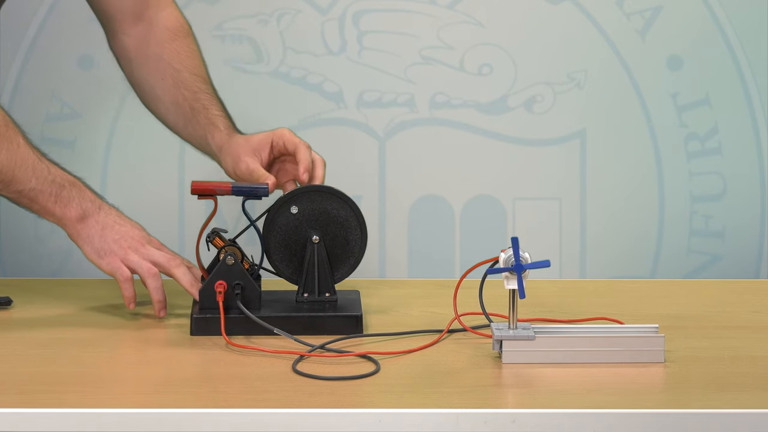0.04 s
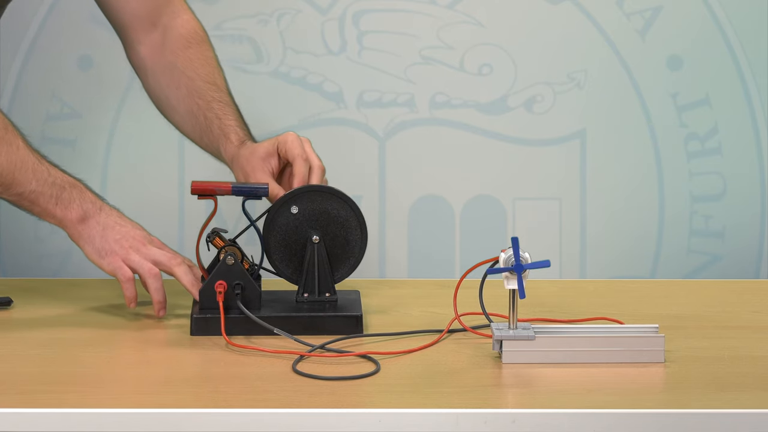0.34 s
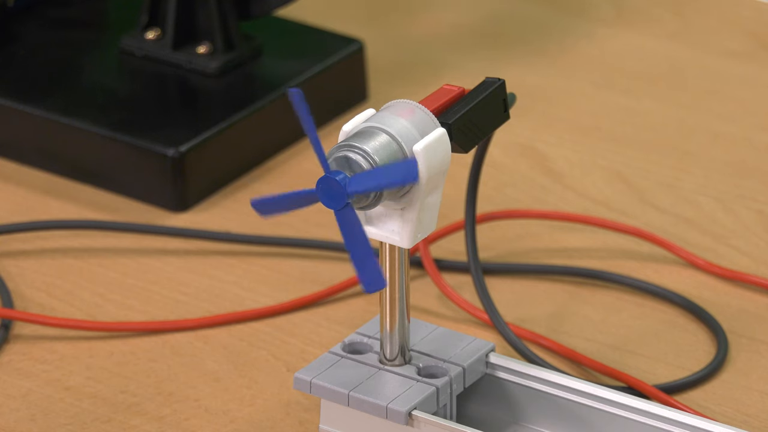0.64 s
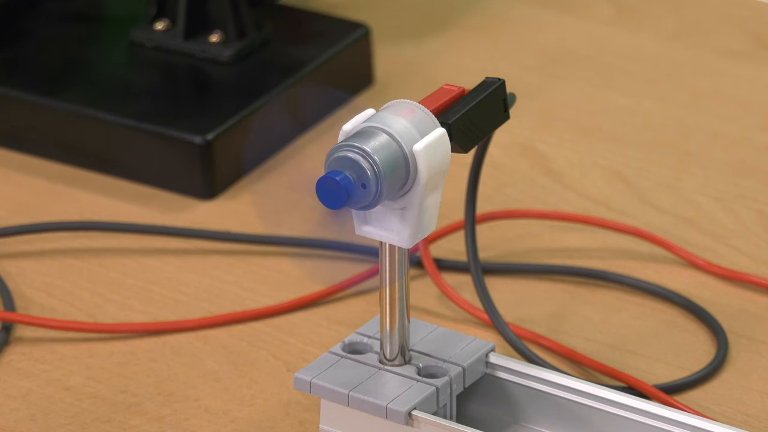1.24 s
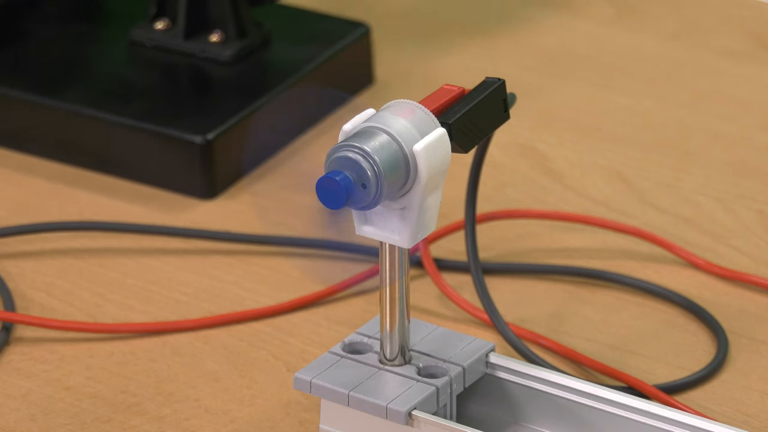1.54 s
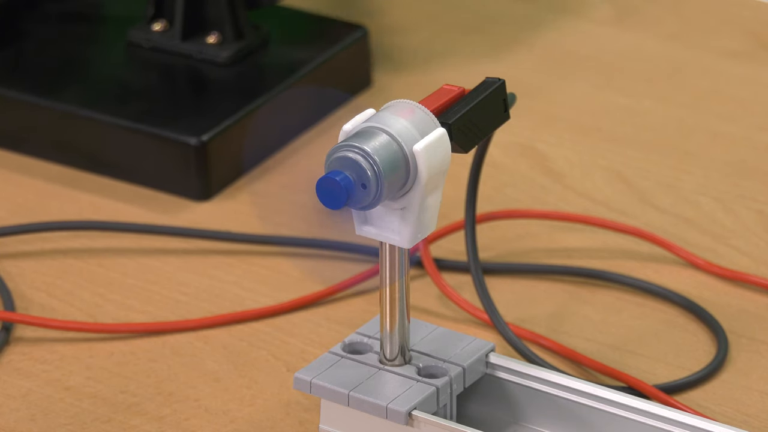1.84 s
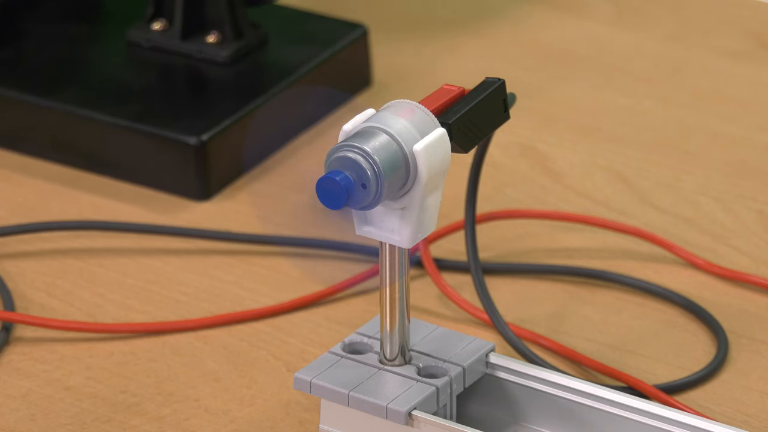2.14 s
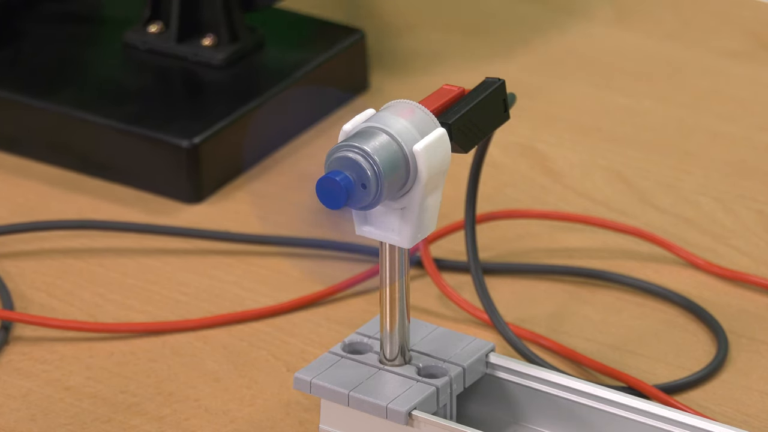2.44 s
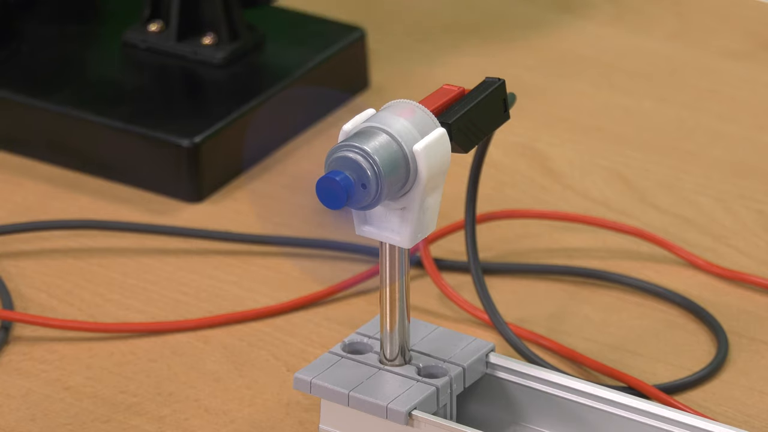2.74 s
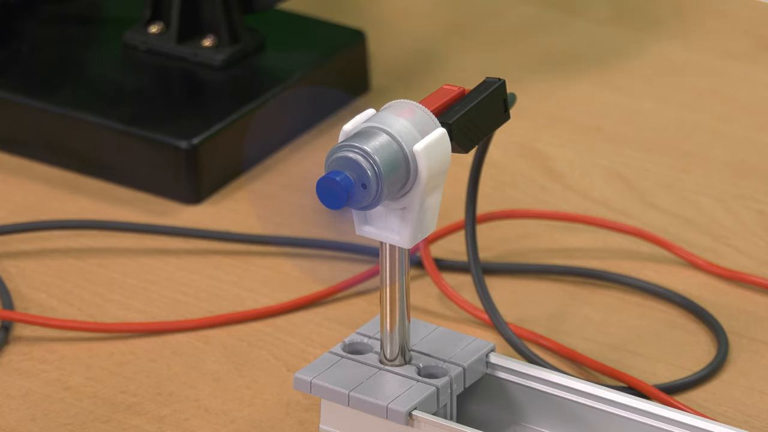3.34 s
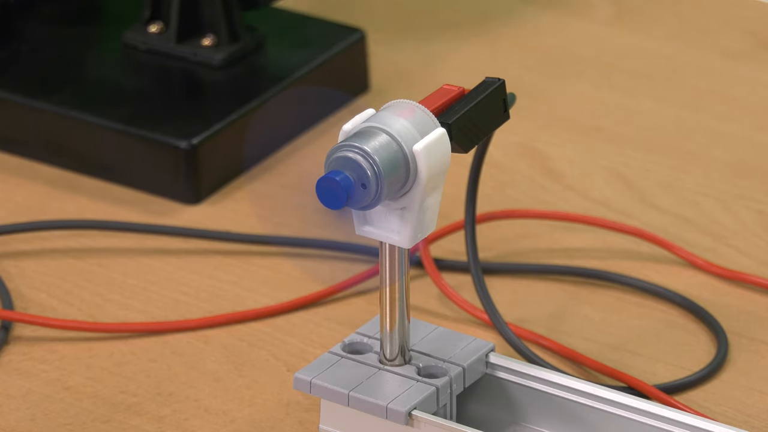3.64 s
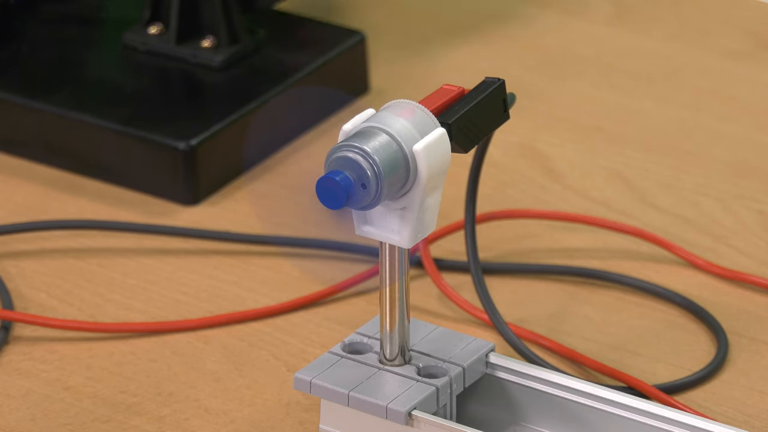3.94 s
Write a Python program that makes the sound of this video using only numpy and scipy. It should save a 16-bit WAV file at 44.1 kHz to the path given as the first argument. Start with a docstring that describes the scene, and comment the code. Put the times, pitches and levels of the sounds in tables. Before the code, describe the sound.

A hand-cranked generator spins up from quick clacks into a loud, whirring metallic rattle.

```python
"""A hand-cranked generator on a table ticks once as it is gripped, then is spun up from rest.
Its drive catches once a turn: single clacks merge into a rattle that grows louder and brighter
with speed as each clack gets shorter. The catches ring the metal parts, the housing and the base.
Behind it lies a small room with a ventilation hum."""
import sys
import numpy as np
from scipy import signal
from scipy.fft import rfft, irfft, next_fast_len
from scipy.io import wavfile
from scipy.ndimage import map_coordinates

SR = 44100
rng = np.random.default_rng(int(sys.argv[2]) if len(sys.argv) > 2 else 0)


def dump_mix(stems):
    """Bounce the given channels to the path in sys.argv[1] as a 16-bit WAV at rate SR."""
    frames = np.atleast_2d(stems).T  # one column per channel
    limited = np.clip(frames, -1, 1)  # hard clip at full scale
    pcm = np.round(limited * 32767).astype(np.int16)
    wavfile.write(sys.argv[1], SR, pcm)


N = 176400

# the run-up (time [s], speed [turns/s])
DRIVE_SPEED = [(0.985, 7.2), (1.15, 14.219), (1.6, 20.714), (1.8, 26.814), (2.15, 35.4), (2.2, 34.81),
               (2.3, 38.67), (2.55, 31.024), (2.75, 39.528), (2.95, 43.618), (3.1, 38.419), (3.15, 41.81),
               (3.3, 42.395), (3.4, 47.854), (3.55, 48.156), (3.65, 43.842), (3.85, 47.214), (4.0, 56.418)]
def drive():
    """The crank spins up in uneven surges: gives the speed and the running count of turns."""
    speed = curve(DRIVE_SPEED)
    cranking = np.arange(N) / SR >= DRIVE_SPEED[0][0]
    return speed, np.cumsum(speed * cranking) / SR


def contact(turns, rise_turns=0.015, decay_turns=0.14, scatter_db=0.78, rub_db=-25,
            chatters_per_turn=6, chatter_db=-10, chatter_s=0.0014):
    """Contact force: one catch a turn, random chatter of loose parts, light rubbing throughout."""
    phase, turn = turns % 1, turns.astype(int)
    strength = amp(scatter_db * rng.standard_normal(turn[-1] + 1))[turn]
    catch = (1 - np.exp(-phase / rise_turns)) * np.exp(-phase / decay_turns)
    hits = rng.random(N) < chatters_per_turn * np.gradient(turns)
    knocks = hits * amp(chatter_db) * rng.random(N)
    chatter = signal.lfilter([1], [1, -np.exp(-1 / (chatter_s * SR))], knocks)
    power = (strength * catch / catch.max()) ** 2 + chatter ** 2 + amp(rub_db) ** 2
    return np.sqrt(power) * (turns > 0)


def grit(force, response, level_db, wet_db):
    """One rattle layer: noise shaped by the contact force, filtered and sent into the room."""
    noise = force * rng.standard_normal((2, N))
    return unit(room(filtered(noise, response), wet_db)) * amp(level_db)


# EQ of the clack's body and of its bright edge (frequency [Hz], gain [dB])
CLACK_EQ = [(300, -32), (500, -1), (950, 3), (1080, -17), (1800, -1), (2600, -2.5), (2800, -4),
            (3300, -4.5), (4000, 2.5), (4600, -3.5), (5300, 5), (6200, -5.5), (7200, -2), (10000, -13.5),
            (16000, -7)]
EDGE_EQ = [(3000, -44), (7000, -19), (8300, -2.5), (9600, -8), (10600, -0.5), (11700, 2), (13000, -1),
           (14200, -2.5), (16000, -5)]
def clacks(force, doublings):
    """The direct sound of the catch; its edge grows faster than its body as the speed doubles."""
    body = grit(force, colour(CLACK_EQ), -53.5 + 8.5 * doublings, wet_db=-2.5)
    edge = grit(force, colour(EDGE_EQ), -52.5 + 11.5 * doublings, wet_db=0)
    return body + edge


# metallic ring (frequency [Hz], width [Hz], gain [dB])
METAL_MODES = [(481.7, 31, 2), (894, 30, -2), (1228, 85, -2.5), (1324, 49, 1), (1589, 54, 4.5),
               (2161, 120, -4.5), (2271, 37, 2), (2427, 64, 4), (2572, 113, 1.5), (3990, 123, -2),
               (5040, 210, -5.5), (5883, 29, -5)]
def metal(force, doublings):
    """The catches ring the metal parts, louder with speed."""
    return grit(force, resonances(METAL_MODES), -54.5 + 10.5 * doublings, wet_db=-3)


# hollow body (frequency [Hz], width [Hz], gain [dB])
HOUSING_MODES = [(364, 18, 0), (843, 72, -1), (1021, 86, -5), (1300, 137, -1.5), (2036, 100, -6),
                 (2297, 130, -4.5)]
# its fader ride (time [s], level [dB])
HOUSING_RIDE = [(1.0, -67), (1.1, -64.5), (1.25, -59), (1.42, -61), (1.6, -61), (1.85, -61.5), (2.2, -55),
                (2.6, -57.5), (3.3, -55.5), (3.6, -53), (4.0, -57)]
def housing(force):
    """The housing answers each catch with a hollow knock."""
    return grit(force, resonances(HOUSING_MODES), curve(HOUSING_RIDE), wet_db=-2.5)


# bright overtones (frequency [Hz], width [Hz], gain [dB])
PING_MODES = [(5900, 330, -1), (6180, 88, 3), (6460, 70, -5)]
# their fader ride (time [s], level [dB])
PING_RIDE = [(1.0, -74.5), (1.44, -68.5), (1.52, -63), (1.63, -60.5), (1.75, -65.5), (2.1, -59.5),
             (2.4, -62), (4.0, -63)]
def ping(force):
    """The catches excite a bright ping that comes out during the run-up."""
    return grit(force, resonances(PING_MODES), curve(PING_RIDE), wet_db=-8)


# top-end shimmer (frequency [Hz], width [Hz], gain [dB])
PULLEY_MODES = [(8922, 34, -3), (11830, 83, -7)]
# its fader ride (time [s], level [dB])
PULLEY_RIDE = [(1.0, -82), (1.6, -72), (2.1, -63), (2.33, -53.5), (2.45, -66), (2.53, -59), (2.7, -59.5),
               (2.88, -53.5), (3.15, -54), (3.36, -56), (3.5, -52.5), (3.62, -54.5), (3.72, -60.5),
               (4.0, -50.5)]
def pulley(force):
    """A thin, nearly dry ring, likely of the pulley."""
    return grit(force, resonances(PULLEY_MODES), curve(PULLEY_RIDE), wet_db=-14)


# resonances of the base and the table top (frequency [Hz], width [Hz], gain [dB])
BASE_MODES = [(781, 14.7, 12.5), (802.6, 20, -3), (830, 5.9, -3)]
TABLE_MODES = [(792, 77, 0)]
# the whirr's fader ride (time [s], level [dB])
BASE_RIDE = [(1.0, -72.5), (1.2, -59), (1.4, -56), (1.6, -58.5), (1.82, -59), (2.05, -54), (2.22, -49.5),
             (2.45, -52), (2.75, -53.5), (3.02, -51.5), (3.22, -49), (3.37, -57), (3.54, -47), (3.66, -53),
             (3.78, -48.5), (4.0, -51)]
def base(speed, turns, shake_s=0.011, roughness=0.78, lag_s=0.005):
    """Each catch knocks the base, whose ring runs together into a hollow whirr."""
    knocks = np.diff(np.ceil(turns), prepend=0) / np.sqrt(speed)
    t = np.arange(SR // 40) / SR
    shake = signal.fftconvolve(knocks, np.exp(-t / shake_s))[:N] * rng.standard_normal(N)
    push = unit(knocks) + roughness * unit(shake)
    # the table top passes the knock on slowly, so the ring swells
    table = lambda hz: resonances(TABLE_MODES)(hz) * np.exp(-2j * np.pi * hz * lag_s)
    ring = filtered(push, lambda hz: resonances(BASE_MODES)(hz) * table(hz))
    return unit(ring) * amp(curve(BASE_RIDE))


# the tick's ring (frequency [Hz], gain [dB], t60 [s])
TICK_RING = [(920, -5, 0.06), (1130, -12, 0.098), (1930, -15, 0.067), (2520, -14, .07), (2760, 2, 0.049),
             (2750, -10, 0.26), (4210, -13, 0.052)]
# EQ of its crack (frequency [Hz], gain [dB])
CRACK_EQ = [(500, -8), (1100, 3.5), (2100, -2), (2750, 8), (3500, -15), (4400, -7.5), (6500, -27),
            (15000, -32)]
def tick(start_s=0.257, level_db=-51, crack_t60=0.074):
    """The crank takes up its slack with one light metallic tick."""
    t = np.maximum(np.arange(N) / SR - start_s, 0)
    ring = sum(amp(db - 60 * t / t60) * np.sin(2 * np.pi * hz * t) for hz, db, t60 in TICK_RING)
    crack = unit(filtered(rng.standard_normal((2, N)), colour(CRACK_EQ))) * amp(-60 * t / crack_t60)
    mid_only = np.array([[1], [0]])
    return room(amp(level_db) * (ring * mid_only + crack) * (t > 0), wet_db=-6)


# reverb decay (frequency [Hz], t60 [s])
ROOM_DECAY = [(200, 0.74), (1500, 0.42), (5000, 0.18), (9000, 0.14), (15000, 0.082)]
def room(x, wet_db):
    """Adds the small room's tail, whose treble dies first."""
    hz, t, spectrum = signal.stft(rng.standard_normal((2, SR // 2)), SR, nperseg=256)
    decay = amp(-60 * t / along(ROOM_DECAY, hz)[:, None])
    tail = signal.istft(spectrum * decay, SR, nperseg=256)[1]
    tail = np.pad(tail / np.linalg.norm(tail[0]), ((0, 0), (SR // 250, 0)))  # 4 ms pre-delay
    return x + amp(wet_db) * signal.fftconvolve(x, tail, axes=1)[:, :N]


# room tone EQ (frequency [Hz], gain [dB])
AIR_EQ = [(20, -38), (35, -14), (65, -16), (80, -19.5), (100, -3), (140, -1.5), (200, 1.5), (260, -2),
          (380, -1.5), (520, -8.5), (800, -12.5), (1250, -16), (1700, -24.5), (3000, -26.5), (6500, -36),
          (11000, -34), (16000, -33.5)]
# its stereo image (frequency [Hz], correlation [-1..1])
AIR_IMAGE = [(60, .97), (130, .997), (300, .997), (640, .98), (1400, .86), (3100, .45), (6800, .12),
             (15000, -.1)]
# hum lines (frequency [Hz], level [dB])
HUM_LINES = [(48.4, -76.5), (140, -69), (183, -59.5), (200, -60.5)]
def ventilation(air_db=-56.5, waver_db=2.5, drift_rad=0.67):
    """A steady bed of air with low, slightly unsteady hum lines that beat together."""
    t = np.arange(N) / SR
    air = unit(stereo(filtered(rng.standard_normal((2, N)), colour(AIR_EQ)), AIR_IMAGE))
    hum = 0
    for hz, db in HUM_LINES:
        gain = amp(db + waver_db * wobble(4.43))
        hum += gain * np.sin(2 * np.pi * hz * t + drift_rad * wobble(4.99))
    return amp(air_db) * air + np.sqrt(2) * hum


def amp(db):
    """Decibels to gain."""
    return 10 ** (np.asarray(db) / 20)


def unit(x):
    """Scaled to rms 1."""
    return x / np.sqrt(np.mean(x ** 2) + 1e-20)


def along(points, hz):
    """Reads (frequency, value) points on a log axis."""
    knots, values = np.transpose(points)
    return np.interp(np.log(hz + 1), np.log(knots + 1), values)


def curve(rows):
    """(time, value) points as one value per sample."""
    return np.interp(np.arange(N) / SR, *np.transpose(rows))


def wobble(rate):
    """A smooth random curve, rate knots a second."""
    return map_coordinates(rng.standard_normal(int(N * rate / SR) + 4), [np.arange(N) * rate / SR])


def filtered(x, response):
    """x through a complex frequency response."""
    size = next_fast_len(N + SR // 2)
    return irfft(rfft(x, size) * response(np.fft.rfftfreq(size, 1 / SR)), size)[..., :N]


def colour(points):
    """EQ curve through (frequency, gain) points."""
    return lambda hz: amp(along(points, hz))


def resonances(modes):
    """Parallel band-pass resonators of alternating polarity."""
    return lambda hz: sum((-1) ** k * amp(db) * 1j * hz * width / (peak**2 - hz**2 + 1j * hz * width)
                          for k, (peak, width, db) in enumerate(modes))


def stereo(pair, image):
    """Two unrelated signals as mid and side, mixed to the image's left-right correlation."""
    angle = lambda hz: np.arccos(np.clip(along(image, hz), -1, 1)) / 2
    mid, side = filtered(pair, lambda hz: np.array([np.cos(angle(hz)), np.sin(angle(hz))]))
    return np.array([mid + side, mid - side])


# the generator's stereo image (frequency [Hz], correlation [-1..1])
MACHINE_IMAGE = [(600, 1), (1400, 0.99), (3100, 0.96), (6800, 0.88), (9000, 0.47), (10000, -0.029),
                 (12000, -0.7), (15000, -0.23)]
def scene(reference_turns_per_s=40, balance_db=-3.5):
    """The generator over the room tone; the whole mix leans a little to the right."""
    speed, turns = drive()
    force = contact(turns)
    doublings = np.log2(speed / reference_turns_per_s)
    rattle = clacks(force, doublings) + metal(force, doublings)
    rattle += housing(force) + ping(force) + pulley(force)
    machine = stereo(rattle + tick(), MACHINE_IMAGE) + base(speed, turns)
    return (machine + ventilation()) * amp([[balance_db / 2], [-balance_db / 2]])


def record(dry, top_hz=15900):
    """A brick-wall high cut on the mix."""
    return filtered(dry, lambda hz: hz < top_hz)


dry = scene()
out = record(dry)
dump_mix(out)
```